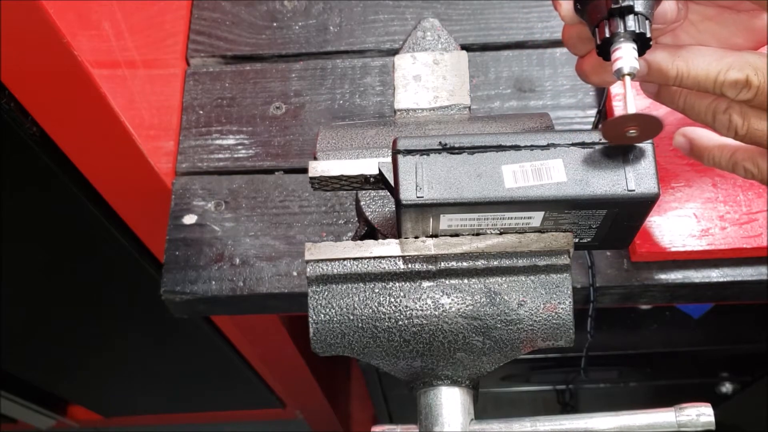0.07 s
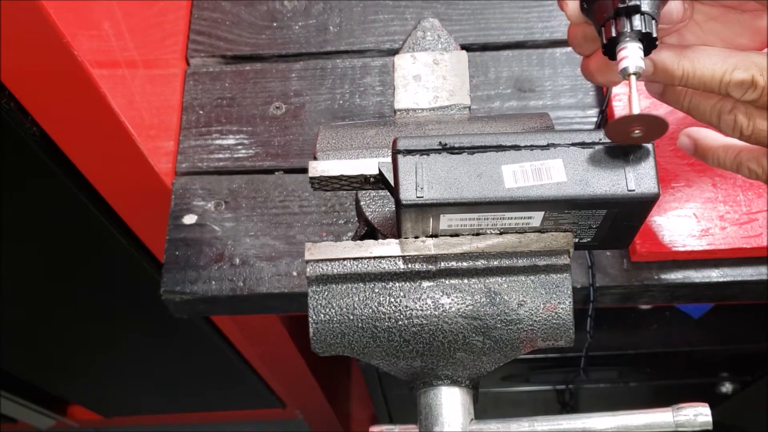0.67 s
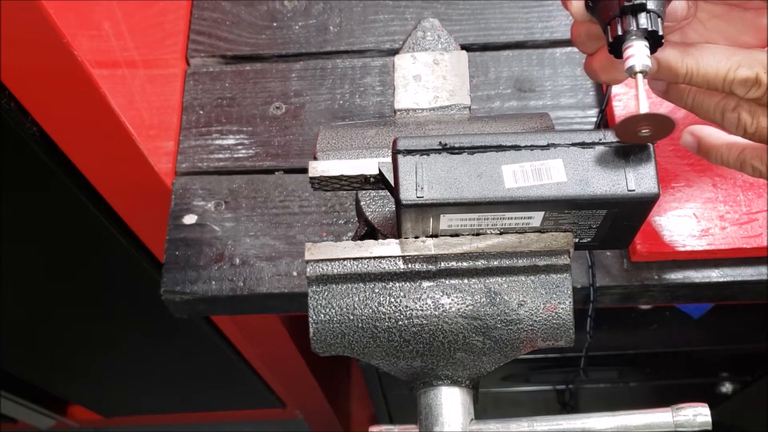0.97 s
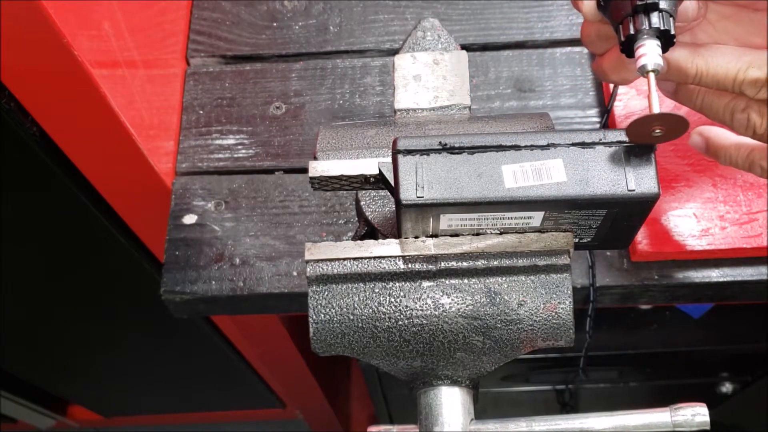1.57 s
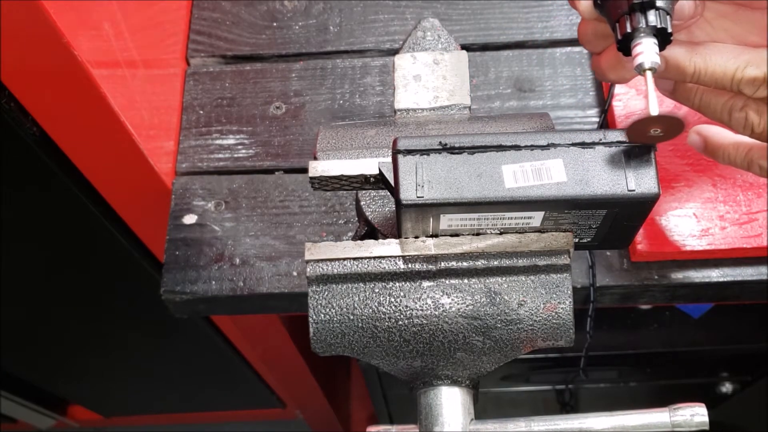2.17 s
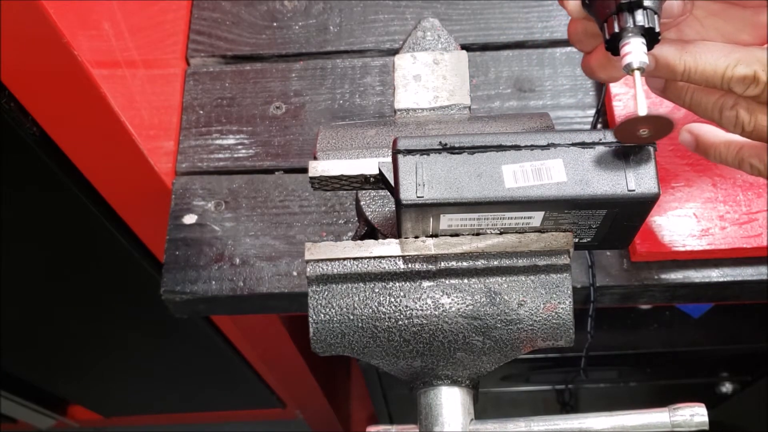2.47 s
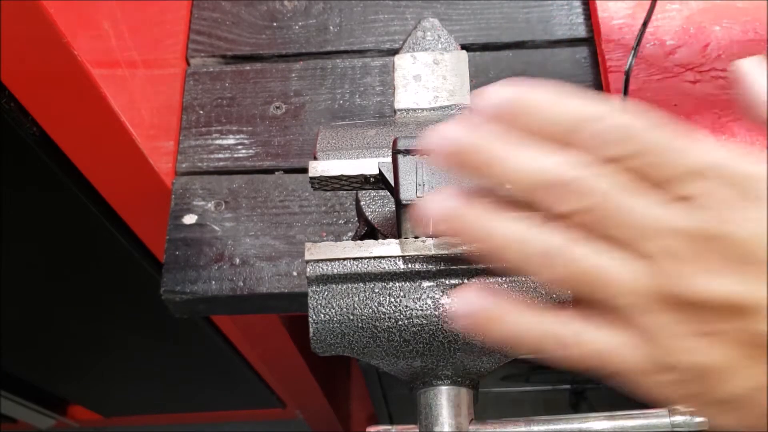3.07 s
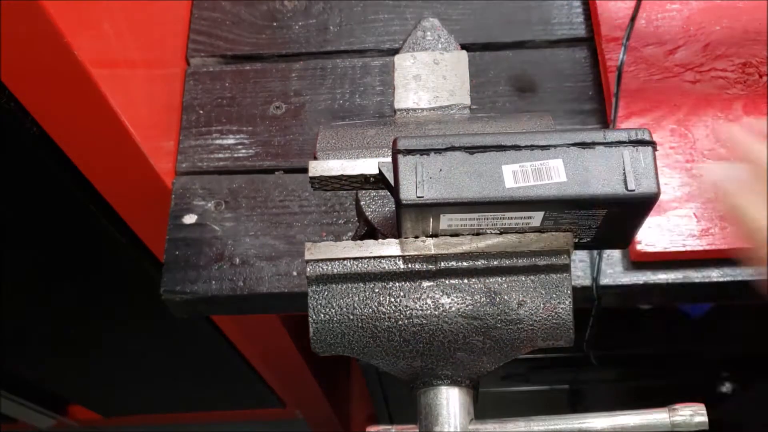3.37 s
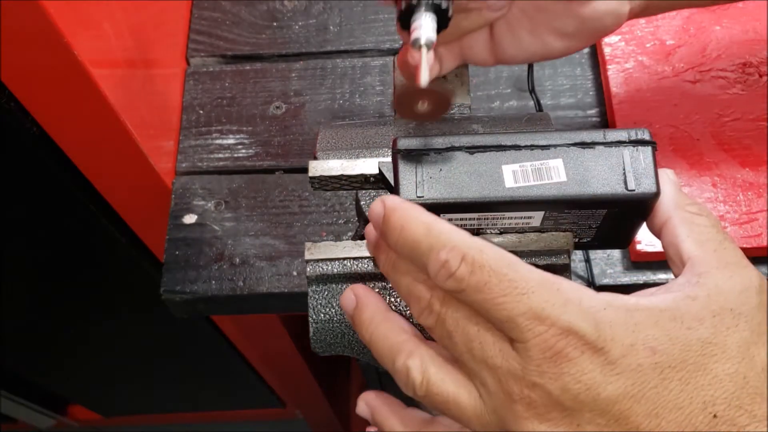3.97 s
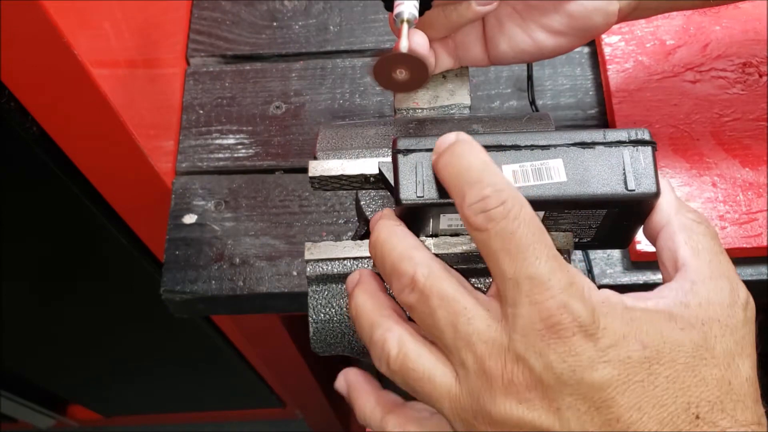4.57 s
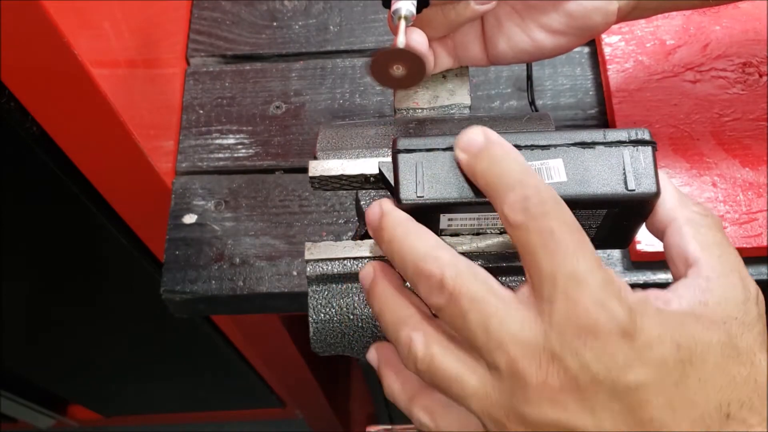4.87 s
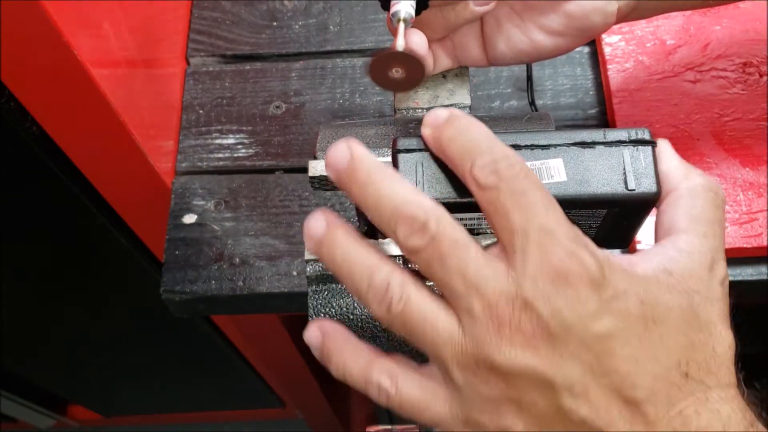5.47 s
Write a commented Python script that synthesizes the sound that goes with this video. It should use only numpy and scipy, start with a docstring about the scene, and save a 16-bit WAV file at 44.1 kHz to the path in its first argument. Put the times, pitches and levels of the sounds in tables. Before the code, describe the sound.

A rotary tool's cutting disc grinds roughly into plastic, squeals briefly, then lifts away and whines freely while a hand knocks the case.

```python
"""A rotary tool cuts a plastic case held in a vice on a workbench, close to the left microphone.
From the start the slightly untrue disc bites once a turn and sets the case ringing, while the load
pulls the motor speed about. Near 2 s the slot pinches the disc into a squeal; then the disc bounces.
At 2.6 s the tool is lifted and whines freely. From 3.3 s a hand knocks and slides on the case, the
tool comes near again, and at the end its fan's draught rumbles on the microphone."""
import sys
import numpy as np
from scipy import signal
from scipy.fft import rfft, irfft, next_fast_len
from scipy.io import wavfile
from scipy.ndimage import uniform_filter1d

SR = 44100
rng = np.random.default_rng(int(sys.argv[2]) if len(sys.argv) > 2 else 0)


def unload_wav(signal):
    """Save mono or channel-first audio to the path in sys.argv[1] as 16-bit WAV at rate SR, clipped to [-1, 1]."""
    wavfile.write(
        sys.argv[1],
        SR,
        np.round(np.clip(np.atleast_2d(signal).T, -1, 1) * 32767).astype(np.int16),
    )


N = 248283
TIME = np.arange(N) / SR


def from_db(db):
    """Decibels to gain."""
    return np.exp(np.asarray(db) * (np.log(10) / 20))


def rms_one(x):
    """Scale to rms 1."""
    return x / np.sqrt(np.mean(x ** 2) + 1e-20)


def evened(x, size=1400):
    """Hold the rms at 1 over a few turns, leaving the single bites standing."""
    return x / np.sqrt(np.maximum(uniform_filter1d(uniform_filter1d(x ** 2, size), size // 2), 1e-12))


def curve(rows):
    """Join (time_s, value) points into a value at every sample."""
    return np.interp(TIME, *np.transpose(rows))


def swell(centre_s, length_s):
    """A smooth rise and fall of height 1 around a moment."""
    return np.exp(-2 * np.minimum(((TIME - centre_s) / length_s) ** 2, 20))


def swells(rows):
    """Gain that rises out of silence at each (centre_s, length_s, level_db)."""
    return sum(from_db(db) * swell(s, length) for s, length, db in rows)


def bumps_db(rows):
    """Decibels that leave 0 briefly at each (centre_s, length_s, change_db)."""
    return sum(db * swell(s, length) for s, length, db in rows)


def drift(rate_hz, size=8192):
    """A random wander of rms 1, mostly slower than rate_hz."""
    hz = np.arange(size // 2 + 1) * SR / N
    slow = irfft(rfft(rng.standard_normal(size)) / (1 + (hz / rate_hz) ** 2))
    return np.interp(TIME, np.linspace(0, N / SR, size), rms_one(slow))


def at_hz(points, hz):
    """Read a spectrum on a log-frequency axis."""
    point_hz, value = np.transpose(points)
    return np.interp(np.log(np.maximum(hz, 1)), np.log(point_hz), value)


def shaped(x, gain_at):
    """Filter by a gain given as a function of frequency."""
    size = next_fast_len(N + 4096)
    return irfft(rfft(x, size) * gain_at(np.arange(size // 2 + 1) * SR / size), size)[..., :N]


def hiss(spectrum):
    """Coloured noise, partly alike at both microphones, falling away beyond its spectrum's ends."""
    def gain_at(hz):
        low_cut = 1 + (.7 * spectrum[0][0] / (hz + 1)) ** 4
        high_cut = 1 + (.7 * hz / spectrum[-1][0]) ** 8
        return from_db(at_hz(spectrum, hz)) / low_cut / high_cut

    white = rng.standard_normal((2, N)) + 0.58 * rng.standard_normal(N)
    return rms_one(shaped(white, gain_at))


def resonate(force, modes, wander_db=0, detune=0):
    """Parallel resonances of alternating sign; a moving contact makes strength and pitch wander."""
    out = 0
    for k, (hz, width_hz, db) in enumerate(modes):
        r = np.exp(-np.pi * width_hz / SR)
        gain = from_db(db + wander_db * drift(rate_hz=12)) if wander_db else from_db(db)
        if detune:
            carrier = np.exp(2j * np.pi * np.cumsum(hz * (1 + detune * drift(rate_hz=22))) / SR)
            ring = (carrier * signal.lfilter([1 - r, 1 - r], [1, -r], force / carrier + 1e-18)).real
        else:
            poles = [1, -2 * r * np.cos(2 * np.pi * hz / SR), r * r]
            ring = signal.lfilter([(1 - r * r) / 2, 0, (r * r - 1) / 2], poles, force + 1e-18)
        out = out + (-1) ** k * gain * ring
    return out


def echoes(x, t60_s, start_s):
    """Dense reflections of unit energy, different at each microphone."""
    t = np.arange(SR // 2) / SR
    tail = rng.standard_normal((2, len(t))) * from_db(-60 * t / t60_s) * (t > start_s)
    tail /= np.sqrt(np.sum(tail ** 2, axis=1, keepdims=True))
    return signal.fftconvolve(np.atleast_2d(x), tail, axes=1)[:, :N]


def workshop(x, bench_db=-5.5, room_db=-6.5):
    """Bench and vice reflect first, then the room; the averted right microphone hears more of both."""
    bench = from_db(bench_db) * echoes(x, t60_s=0.047, start_s=0.00014)
    room = from_db(room_db) * echoes(x, t60_s=0.26, start_s=0.00478)
    return np.array([x + bench[0] + room[0], 0.41 * x + 1.24 * bench[1] + 1.72 * room[1]])


# Room tone at the workbench: frequency_hz, level_db
RUMBLE_SPECTRUM = [(15, -49), (25, -33), (47, -2.5), (81, -6.5), (108, 0), (192, -3), (350, -5.5),
                   (507, -5), (539, -9.5), (659, -3), (1000, -14), (1300, -44), (2200, -120)]


def rumble(level_db=-57, draught_s=4.52, rise_db_per_s=8):
    """The workshop's steady rumble swells as the fan's draught comes near the microphone."""
    return from_db(level_db + rise_db_per_s * np.maximum(TIME - draught_s, 0)) * hiss(RUMBLE_SPECTRUM)


# The spindle under load in the slot: time_s, turns_per_s
CUT_SPEED = [(0, 199), (.12, 186), (.19, 197), (.49, 173), (.73, 142), (.78, 146), (.85, 202), (.89, 199),
             (.99, 168), (1.06, 191), (1.1, 176), (1.15, 169), (1.24, 180), (1.42, 179), (1.52, 189),
             (1.56, 203), (1.69, 210), (1.73, 163), (1.79, 181), (1.83, 177), (1.88, 186.5), (1.92, 187),
             (2.01, 184.3), (2.07, 188.5), (2.15, 191), (2.34, 199.5), (2.41, 198), (2.46, 194),
             (2.5, 191.3), (2.6, 190.5)]
# Clear of the slot it settles and sags very slightly: time_s, turns_per_s
IDLE_SPEED = [(2.72, 188.8), (4.0, 189.05), (5.63, 188.52)]


def spindle(hunt_s=.55, hunt_hz=8.6, hunt_turns_per_s=3.3, blur_s=3.82, landing_s=2.501):
    """Speed and turns made: the governor hunts as the motor bogs down."""
    hunting = swell(hunt_s, length_s=.42) * np.cos(2 * np.pi * hunt_hz * (TIME - hunt_s))
    speed = curve(CUT_SPEED + IDLE_SPEED) + hunt_turns_per_s * hunting
    # around 3.8 s the whine's high orders blur for a moment
    flutter = .0004 + .002 * swell(blur_s, length_s=.36)
    turns = np.cumsum(speed * (1 + flutter * drift(rate_hz=40))) / SR
    # an even turn, on which a bouncing disc lands hard, falls at landing_s
    return speed, turns - turns[round(landing_s * SR)] % 2


# The motor's loudness as it is moved about in front of the microphones: time_s, change_db
TOOL_LOUDNESS = [(2.6, -0.5), (3.1, -1.5), (3.55, -2.5), (3.9, 1), (4.75, 0.5), (5.3, 5), (5.63, 7)]
# Its path from aside (0) to close by the case (1): time_s, nearness
TOOL_PATH = [(3.45, 0), (3.8, 0.8), (4.5, 1)]


def tool_position():
    """Where the hand holds the tool, as a change of level in dB and a nearness."""
    return curve(TOOL_LOUDNESS), curve(TOOL_PATH)


# Fan air and brush hiss at close range: frequency_hz, level_db
AIR_SPECTRUM = [(700, -2), (1100, -1), (1280, 7), (1500, -2), (2100, 2), (3200, -4), (4300, -9),
                (5800, -13), (6800, -5), (8200, -7), (9600, -1), (11400, -1), (12400, -3), (15700, -4)]
# The vents, facing the microphone: frequency_hz, level_db
VENT_SPECTRUM = [(1400, 0), (2100, 18), (3200, 0), (5500, -20), (9500, -3), (11300, 7), (12500, 4),
                 (15500, -5)]


def cooling_air(turns, tool_db, air_db=-55.5, vent_s=3.82, vent_db=-51):
    """Fan air and brush hiss throb on every turn; the vents hiss as they sweep past."""
    throb = 1 + .4 * np.cos(2 * np.pi * turns)
    vents = from_db(vent_db) * swell(vent_s, length_s=.36) * hiss(VENT_SPECTRUM)
    return from_db(air_db + 1.62 * tool_db) * throb * hiss(AIR_SPECTRUM) + vents


# The motor's strong orders, held aside and held near: speed_multiple, aside_db, near_db
WHINE_ORDERS = [(7, -66, -58.5), (8, -60, -63), (10, -61.5, -61.5), (11, -64, -58.5), (12, -76, -55),
                (15, -70, -63), (17, -68, -64), (21, -78, -65), (30, -85, -73), (35, -60, -60),
                (40, -57, -68), (45, -66, -58), (52, -66, -56), (53, -64, -71), (54, -57, -59),
                (55, -56, -59), (56, -62, -73), (58, -57, -67), (62, -58, -58.5), (66, -68, -62),
                (80, -70, -61.5)]
# The weaker orders between them: frequency_hz, level_db
BUZZ_SPECTRUM = [(190, -70), (500, -78), (1100, -84), (2000, -73), (3400, -72), (4300, -83), (6000, -83),
                 (6700, -67), (8200, -73), (8850, -59), (9700, -59), (11000, -66), (11500, -64),
                 (12800, -67), (15700, -64)]


def motor(turns, tool_db, nearness, sets=3, treble_hz=5500, size=4096):
    """The commutator buzzes alike on each turn; which orders stand out depends on where it is held."""
    orders = np.arange(1, 84)
    hz = orders * IDLE_SPEED[-1][1]
    bands = [(hz < treble_hz, tool_db)]
    for k in range(sets):   # interleaved sets of high orders swell and fade as the tool sways
        sway_db = 3.5 * np.tanh(drift(rate_hz=4))
        bands.append(((hz >= treble_hz) & (orders % sets == k), tool_db + sway_db))
    phases = np.exp(1.6j * rng.standard_normal(len(orders)))
    strong, aside_db, near_db = np.transpose(WHINE_ORDERS)
    out = 0
    for strong_db, share, buzz_db in ((aside_db, 1 - nearness, -2), (near_db, nearness, 0.012)):
        db = at_hz(BUZZ_SPECTRUM, hz) + buzz_db + 2 * rng.standard_normal(len(orders))
        db[np.round(strong).astype(int) - 1] = strong_db
        for band, level_db in bands:
            one_turn = irfft(np.r_[0, from_db(db) * phases * band], size) * size / np.sqrt(2)
            buzz = np.interp(turns % 1 * size, np.arange(size), one_turn)
            out = out + share * from_db(level_db) * buzz
    return out


def past_hands(x, nearness, corner_hz=2200):
    """Moving hands reflect the high orders, most with the tool aside; the right hears mainly bench."""
    reflected = sum(np.tanh(drift(rate_hz=4)) * echoes(x, t60_s=0.018, start_s=0.00057)
                    for _ in range(2))
    treble = shaped(reflected, lambda hz: hz ** 2 / (hz ** 2 + corner_hz ** 2))
    off_bench = echoes(x, t60_s=.02, start_s=.0005)[1]
    steady = np.array([x, .5 * x + .85 * off_bench])
    return steady + from_db(-4) * (1 - .55 * nearness) * treble


# A hand knocks on the case in the vice: start_s, peak_db, hardness_hz
HAND_KNOCKS = [(3.289, -21.5, 12000), (3.294, -27, 9000), (4.424, -36, 4000), (5.189, -40, 8000),
               (5.328, -31.5, 1000)]
# The knocked case: pitch_hz, width_hz, level_db
CASE_MODES = [(850, 70, -6), (1220, 100, 1), (1900, 400, -11), (3100, 400, -6), (4200, 400, -3),
              (4950, 350, 1), (5550, 350, 0), (6900, 700, -5), (9500, 3000, -12)]


def knocks(decay_s=0.0024):
    """Each knock is a short burst of force, duller for a softer touch, that rings the case."""
    out = np.zeros(N)
    t = np.arange(SR // 10) / SR
    for start_s, peak_db, hardness_hz in HAND_KNOCKS:
        burst = rng.standard_normal(len(t)) * np.exp(-t / decay_s)
        soft = np.exp(-2 * np.pi * hardness_hz / SR)
        touch = signal.lfilter([1], [1, -2 * soft, soft * soft], burst)
        ring = resonate(touch, CASE_MODES)
        at = round(start_s * SR)
        out[at:at + len(t)] += (from_db(peak_db) * ring / np.abs(ring).max())[:N - at]
    return out


# The hand slides on the case, close to the left microphone: centre_s, length_s, level_db
HAND_SLIDES = [(3.37, 0.15, -48), (4.948, 0.09, -49), (5.21, 0.059, -48.5), (5.334, 0.043, -49),
               (5.542, 0.075, -50)]
# Skin rubbing on plastic: frequency_hz, level_db
SKIN_SPECTRUM = [(400, -30), (1300, 9), (2100, 4), (3800, 3.5), (6000, -4), (11000, -1), (15000, -18)]


def sliding_skin(squeak_s=3.41, squeak_db=-56, pitch_hz=2030, rise_hz_per_s=2400):
    """Skin slides in soft swells of noise; once a finger sticks and slips in a rising squeak."""
    slides = swells(HAND_SLIDES) * hiss(SKIN_SPECTRUM)
    hz = pitch_hz + rise_hz_per_s * (TIME - squeak_s)
    squeak = rms_one(drift(rate_hz=110) * np.sin(2 * np.pi * np.cumsum(hz) / SR))
    return slides + from_db(squeak_db) * swell(squeak_s, length_s=.06) * squeak


# Swarf caught in the slot: centre_s, length_s, level_db
SWARF_SCRAPES = [(.05, .03, -37), (.475, .028, -31.5), (.885, .026, -34), (1.4, .08, -43),
                 (1.78, .018, -33), (1.825, .02, -33), (2.19, .06, -38), (2.57, .07, -47)]
# What it rings with: pitch_hz, width_hz, level_db
SWARF_MODES = [(347, 100, -21), (630, 420, -8.5), (920, 380, -11.5), (1294, 300, 11)]


def swarf(grit):
    """Loose swarf scrapes unevenly in the slot."""
    scraping = grit * from_db(4.4 * drift(rate_hz=34))
    return swells(SWARF_SCRAPES) * rms_one(resonate(scraping, SWARF_MODES))


# Coarse chips torn from the case: centre_s, length_s, level_db
CHIP_RIPS = [(.07, 0.094, -40), (.163, 0.014, -28), (.21, 0.014, -30.5), (.462, 0.034, -27),
             (.63, .016, -33), (.815, 0.048, -34), (.93, .025, -39), (1.14, 0.032, -38), (1.41, .06, -34.5),
             (1.85, .04, -34)]
# What they ring with: pitch_hz, width_hz, level_db
CHIP_MODES = [(2180, 320, -5.5), (2800, 490, -7), (3450, 420, 2.5), (3880, 380, 0), (4190, 320, 4.5)]


def chips(friction):
    """The rim rips out coarse chips in rough surges."""
    return swells(CHIP_RIPS) * evened(resonate(friction, CHIP_MODES))


# The pinched disc, heard close: speed_multiple, level_db
SQUEAL_ORDERS = [(1, -38), (2, -36), (3, -17.5), (4, -32), (5, -31), (6, -22), (7, -19), (8, -19),
                 (9, -11.5), (10, 0), (11, -5), (12, -15), (13, -11.5), (14, -17), (15, -16), (16, -10),
                 (17, -9), (18, -4), (19, -2.5), (20, -11), (21, -7.5), (22, -11), (23, -24), (24, -14)]


def squeal(turns, level_db=-22.5):
    """The pinched disc strikes exactly alike on every turn and locks into a clean buzzing squeal."""
    tone = sum(from_db(db) * np.cos(2 * np.pi * round(k) * turns + rng.standard_normal())
               for k, db in SQUEAL_ORDERS)
    return from_db(level_db) * rms_one(tone)


# How hard the disc is pressed on the case: time_s, force_db
HAND_PRESSURE = [(0, -3.5), (0.35, -3), (0.7, -2.5), (1.15, -2.5), (1.45, -6), (1.85, 4), (2.2, 3.6),
                 (2.6, 3.5)]
# It digs in (+) or slips (-) for a moment: centre_s, length_s, force_db, sharpness_db
DISC_DIGS = [(0.15, 0.076, 1, 0.8), (0.326, 0.013, -1, -4), (0.451, 0.076, 7, 1), (0.57, 0.077, -4.5, 0),
             (0.625, 0.024, 6.5, 2), (0.801, 0.025, 6, 0), (0.878, 0.049, 2.5, -4), (0.94, 0.03, 0, 3.5),
             (0.98, 0.051, -4.5, -0.5), (1.1, 0.12, 3, -1.5), (1.26, 0.13, 8.5, -1.2),
             (1.572, 0.058, 5.5, -2.5), (1.664, 0.054, -4, 1.5), (1.821, .025, 3.5, -0.5),
             (1.965, 0.11, 7.5, 0.5), (2.194, 0.078, 1, 0.1), (2.291, 0.029, -2.5, -0.5),
             (2.41, 0.038, -2, 0), (2.534, 0.081, -3.5, 3)]


def disc_load():
    """The load on the disc in dB: pressure, digging and sharpness of the bite."""
    dig_db = bumps_db((s, length, db) for s, length, db, _ in DISC_DIGS)
    edge_db = bumps_db((s, length, db) for s, length, _, db in DISC_DIGS)
    return curve(HAND_PRESSURE), dig_db, edge_db


# The disc bounces, landing hard on every second turn only: centre_s, length_s, weakening_db
DISC_BOUNCES = [(2.165, 0.11, 18), (2.334, 0.056, 6), (2.534, 0.3, 18.5)]
# Steady rubbing between bites, low where the disc grips, high where it scrapes: time_s, share
RUBBING_SHARE = [(0, .2), (.6, .2), (.7, .42), (.8, .42), (.87, .26), (.95, .42), (1.05, .3), (1.3, .38),
                 (1.38, .48), (1.5, .42), (1.62, .25), (1.85, .4), (1.92, .28), (2.05, .26), (2.12, .52),
                 (2.27, .48), (2.34, .3)]


def disc_seating(grip_per_db=.02):
    """Share of rubbing and depth of bounce; force and bouncing turn rubbing into clean bites."""
    press_db, dig_db, _ = disc_load()
    bounce_db = bumps_db(DISC_BOUNCES)
    rubbing = curve(RUBBING_SHARE) - grip_per_db * (dig_db + press_db) - .008 * bounce_db
    return np.clip(rubbing, .1, .95), bounce_db


def disc_bites(turns, rubbing, bounce_db, contact_s=0.00077, jitter_s=.000018):
    """Once a turn the high side of the disc hits the slot, then drags on for about a millisecond."""
    skip_db = bounce_db + 3 * rubbing * drift(rate_hz=5.6)   # a loosely seated disc limps by chance
    unrest = 2 * rubbing + 0.058 * np.abs(skip_db)   # loosens the timing and adds drag
    count = np.arange(1, int(turns[-1]))
    chance = rng.standard_normal((len(count), 2))[:, 1]
    at = np.interp(count, turns, np.arange(N)).astype(int)
    jitter = (jitter_s * SR * unrest[at] ** 2 * chance).round().astype(int)
    bites = np.zeros(N)
    bites[np.clip(at + jitter, 0, N - 1)] = from_db(-skip_db[at] * (count % 2))
    r = np.exp(-2 / (contact_s * SR))
    contact = rms_one(signal.lfilter([1], [1, -2 * r, r * r], bites + 1e-18)) * unrest
    return bites, contact


def lifted(start_s, fall_db_per_s=161):
    """Gain that falls steadily once the disc starts to leave the slot."""
    return from_db(-fall_db_per_s * np.maximum(TIME - start_s, 0))


# Case and disc at close range, from low groan to hard crack: pitch_hz, width_hz, level_db
GROAN_RING = [(147.4, 8, 3), (194, 7.1, -2), (318.6, 15, 8), (352, 23, 2), (431, 34, 2.5), (494, 35, 0),
              (556.3, 21, 5), (668, 14, 6.5)]
WALL_RING = [(824, 101, -18), (1078, 87, -13.5), (1206, 68, -10.5), (1382, 64, -7), (1711, 55, -3.5),
             (1842, 90, 2), (2029, 136, 1.5), (2164, 83, 0.5), (2502, 85, -9.5)]
RIM_RING = [(2730, 88, -5.5), (2895, 130, -11), (2960, 56, -6.5), (3190, 94, 3.5), (3416, 210, 2.9),
            (3525, 140, 6.5), (3654, 140, 2.2), (3913, 220, 0), (4117, 210, -1.5), (4253, 157, 2.5)]
DISC_RING = [(4800, 6700, -12), (5790, 180, -2.5), (6166, 61, -7.5), (6680, 137, 2.5), (6880, 460, -9),
             (7770, 550, -7.5), (8070, 430, -15.5), (9150, 330, -7.5), (10580, 750, -6.5), (11040, 530, -3),
             (11500, 450, -5), (13700, 1350, -15), (14900, 1500, -19)]
CRACK_RING = [(3700, 1200, 3), (6800, 1500, 0), (11000, 3500, -2), (14000, 2500, -7)]
# The case groans louder or softer: centre_s, length_s, change_db
GROAN_SWELLS = [(.57, .08, 4), (.71, .05, 4), (1.15, .06, -2), (1.27, .05, 4), (1.99, .11, 6)]
# Spurts of hiss as the grit tears chips free: centre_s, length_s, change_db
HISS_SPURTS = [(0.083, 0.15, 4.5), (0.295, 0.02, 5.5), (0.833, 0.027, 7), (1.273, 0.016, 3), (1.5, 0.24, 5),
               (1.836, 0.07, 3.5), (2.234, 0.092, 4), (2.533, 0.032, 2.5)]


def grinding(speed, bites, contact, grit, rubbing, bounce_db, pinch, lift_s=2.573, duck_db=9):
    """Blow, drag and steady rub ring case and disc, louder under load, until the tool is lifted."""
    press_db, dig_db, edge_db = disc_load()
    fast = np.interp(speed, [178, 192], [0, 1])   # a fast disc bites brighter

    def force(hit, drag, rub):
        return hit * (1 - rubbing) * rms_one(bites) + grit * (drag * contact + rub * rubbing)

    def effort(level_db, press, dig, edge, fast_db):
        return from_db(level_db + press * press_db + dig * dig_db + edge * edge_db + fast_db * fast)

    walls = evened(resonate(force(hit=1.5, drag=.4, rub=.65), WALL_RING, wander_db=1.4, detune=.011))
    walls *= effort(-29, press=.58, dig=.81, edge=0, fast_db=.02)
    rim = evened(resonate(force(hit=1.4, drag=.55, rub=.7), RIM_RING, wander_db=1.4))
    rim *= effort(-33.5, press=.97, dig=.99, edge=1.9, fast_db=3.5)
    disc = evened(resonate(force(hit=.34, drag=.62, rub=1.86), DISC_RING))
    disc *= effort(-32.5 + bumps_db(HISS_SPURTS), press=.51, dig=.21, edge=.65, fast_db=1.5)
    # the case groans when a multiple of the bite rate meets a low mode, more under a bouncing disc
    groan = rms_one(resonate(force(hit=2.2, drag=.15, rub=.4), GROAN_RING, wander_db=1.4))
    groan_db = -49 + .15 * bounce_db + bumps_db(GROAN_SWELLS)
    groan *= effort(groan_db, press=.51, dig=.19, edge=0, fast_db=-1)
    # each hard landing of the bouncing disc cracks
    bouncing = np.clip(bounce_db / DISC_BOUNCES[-1][2], 0, 1)
    cracks = from_db(-42) * bouncing * evened(resonate(bites, CRACK_RING))
    lingering = lifted(lift_s + 0.046)   # groan and disc hiss hold on a little longer
    case = (walls + rim + cracks) * lifted(lift_s) + groan * lingering
    return case * from_db(-duck_db * pinch) + disc * lingering


def cutting(turns, speed, pinch_s=1.985, pinch_length_s=.19, grain_db=1.5, catching_db=1.6):
    """The disc drags its grit through the plastic, catching unevenly; once the slot pinches it."""
    rubbing, bounce_db = disc_seating()
    bites, contact = disc_bites(turns, rubbing, bounce_db)
    grit = rms_one(rng.standard_normal(N) * from_db(grain_db * rng.standard_normal(N)))
    pinch = np.exp(-np.minimum((2 * (TIME - pinch_s) / pinch_length_s) ** 4, 40))
    grind = grinding(speed, bites, contact, grit, rubbing, bounce_db, pinch)
    debris = chips(grit * (contact + rubbing)) + swarf(grit)
    catching = from_db(catching_db * from_db(-.5 * bounce_db) * drift(rate_hz=28))
    return grind * catching + debris + pinch * squeal(turns)


def placed(x, balance):
    """Share each frequency between left and right with two gains whose mean is 1."""
    return shaped(x, lambda hz: 2 / (1 + from_db(at_hz(balance, hz) * np.array([[-1], [1]]))))


# The case, close to the left microphone: frequency_hz, left_minus_right_db
CASE_BALANCE = [(60, 15.0), (99, 31), (160, 12), (270, 19.5), (450, 8), (740, 19), (1220, 15.5), (2010, 17),
                (3330, 18), (5500, 21.5), (9080, 12), (15000, 5.5)]
# Motor, air and rumble, also on the left: frequency_hz, left_minus_right_db
MOTOR_BALANCE = [(60, 19.0), (99, 24), (160, 16), (270, 22.5), (450, 14.7), (740, 20), (1220, 24),
                 (2010, 18.3), (3330, 26), (5500, 24), (9080, 10.7), (15000, 5.5)]


def scene(cut_db=-1.5):
    """At the bench one spindle drives the cut, the whine and the air; a hand touches the case."""
    speed, turns = spindle()
    tool_db, nearness = tool_position()
    cut = from_db(cut_db) * workshop(cutting(turns, speed))
    hand = workshop(knocks()) + sliding_skin()
    room_tone = rumble()
    whine = past_hands(motor(turns, tool_db, nearness), nearness)
    air = cooling_air(turns, tool_db)
    return placed(cut + hand, CASE_BALANCE) + placed(whine + air + room_tone, MOTOR_BALANCE)


def record(dry):
    """Both microphone channels lose the very top of the treble steeply."""
    cutoff_hz, edge_hz = 15820, 40
    return shaped(dry, lambda hz: 1 / (1 + np.exp(np.minimum((hz - cutoff_hz) / edge_hz, 50))))


dry = scene()
out = record(dry)
unload_wav(out)
```